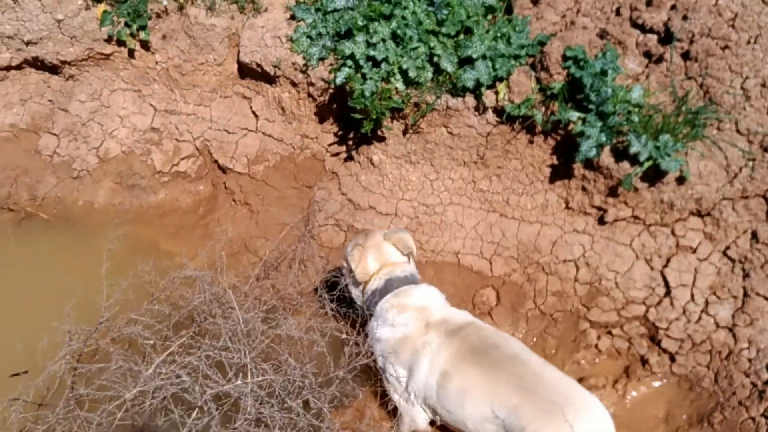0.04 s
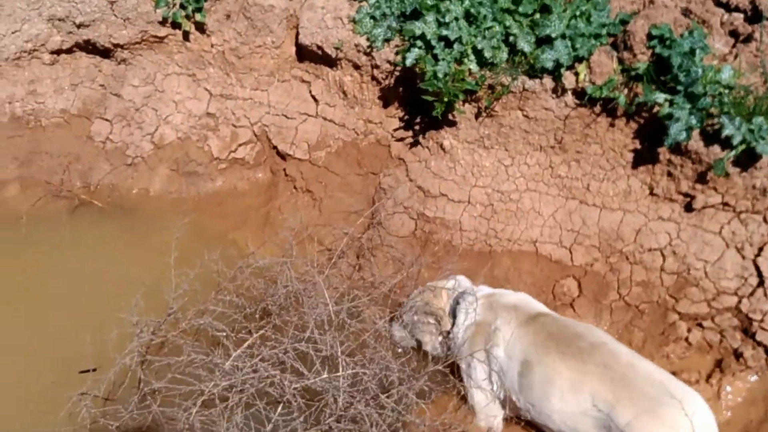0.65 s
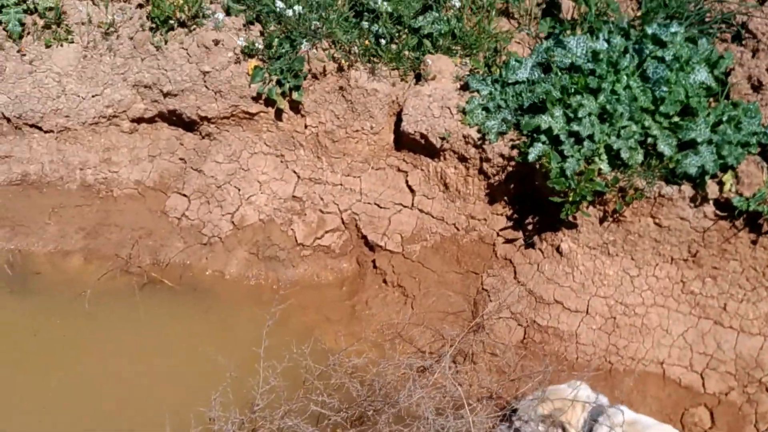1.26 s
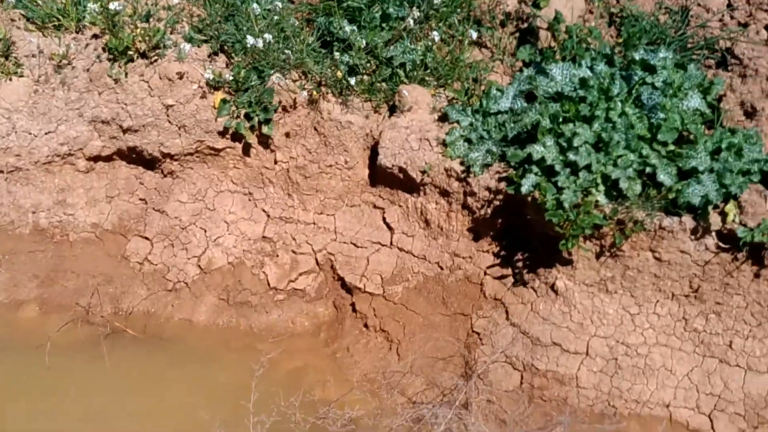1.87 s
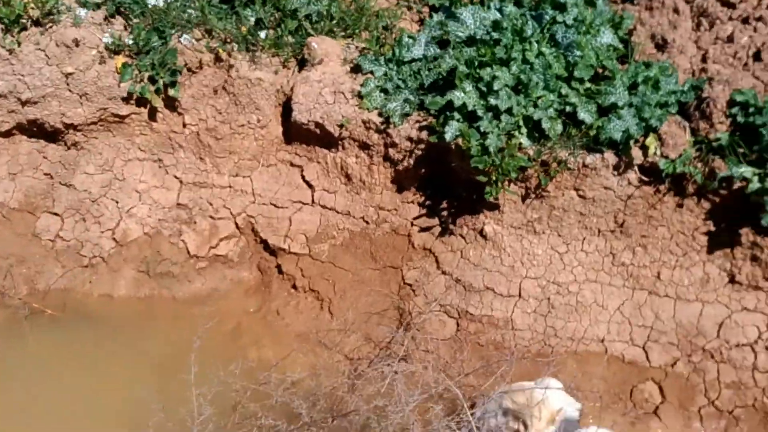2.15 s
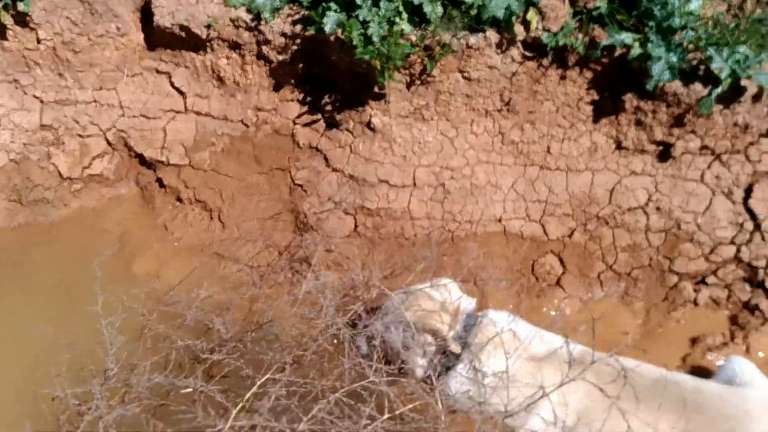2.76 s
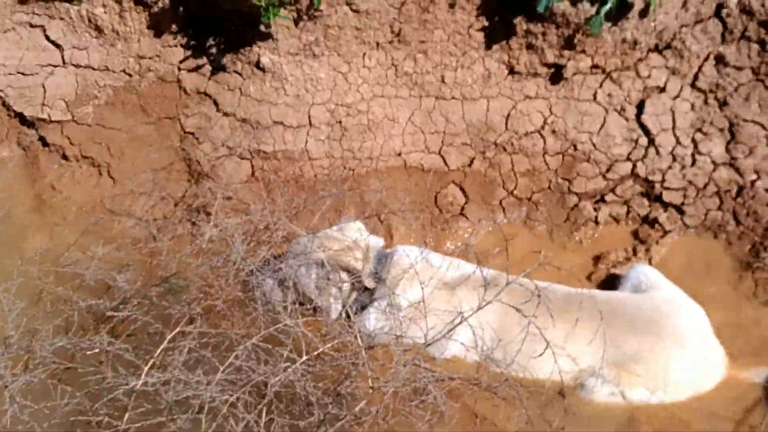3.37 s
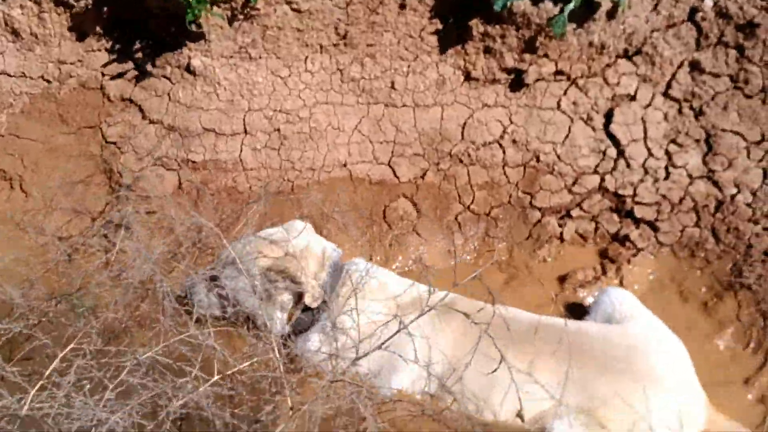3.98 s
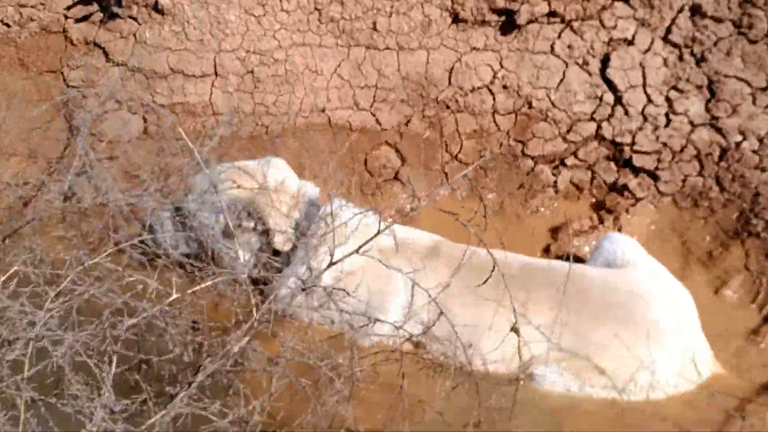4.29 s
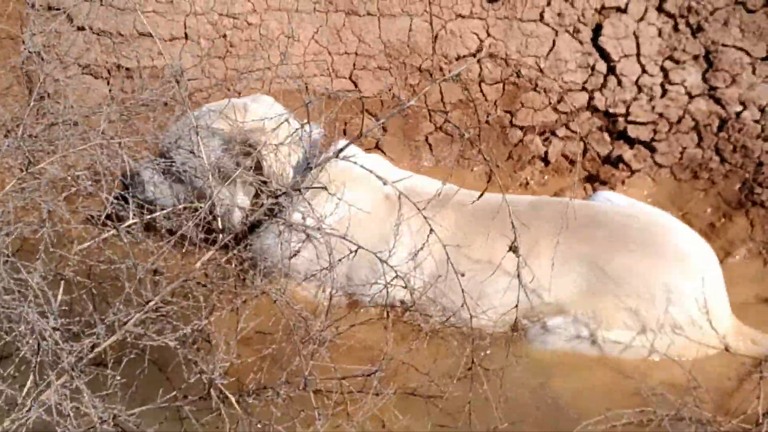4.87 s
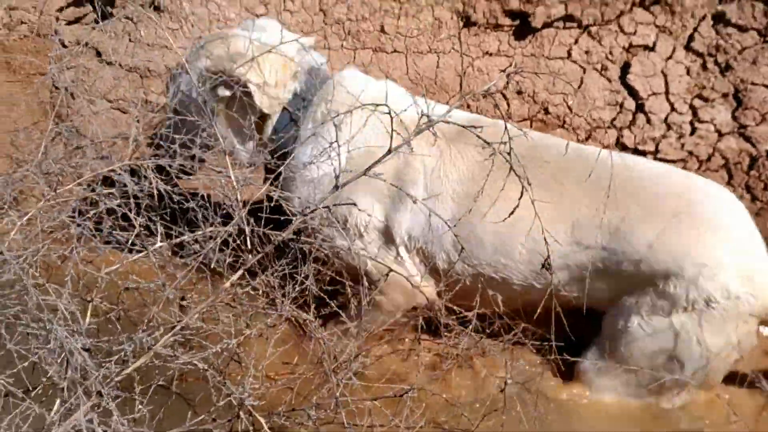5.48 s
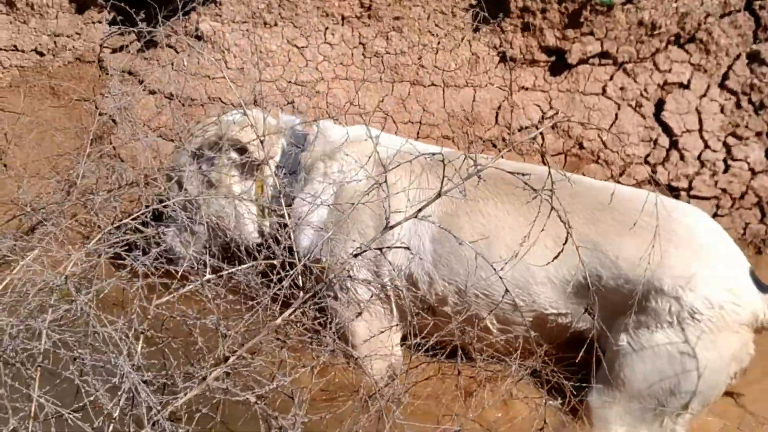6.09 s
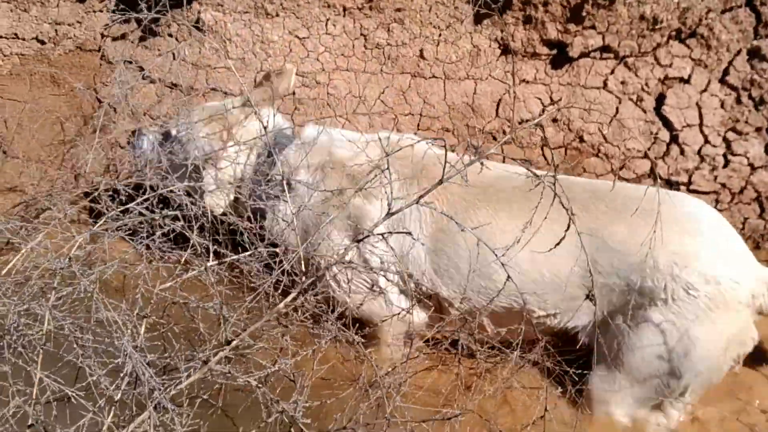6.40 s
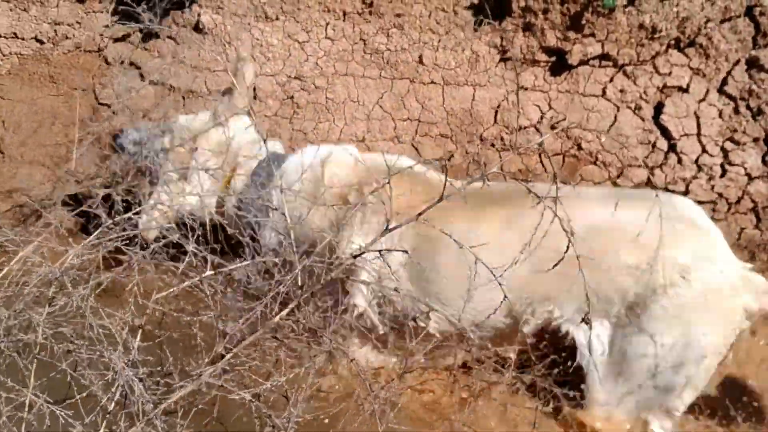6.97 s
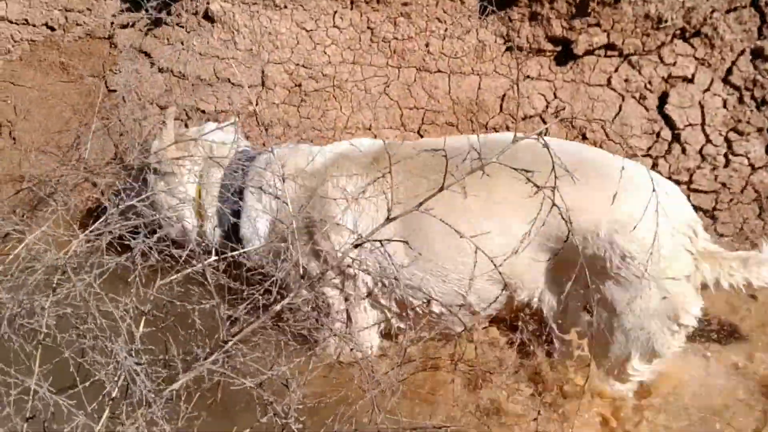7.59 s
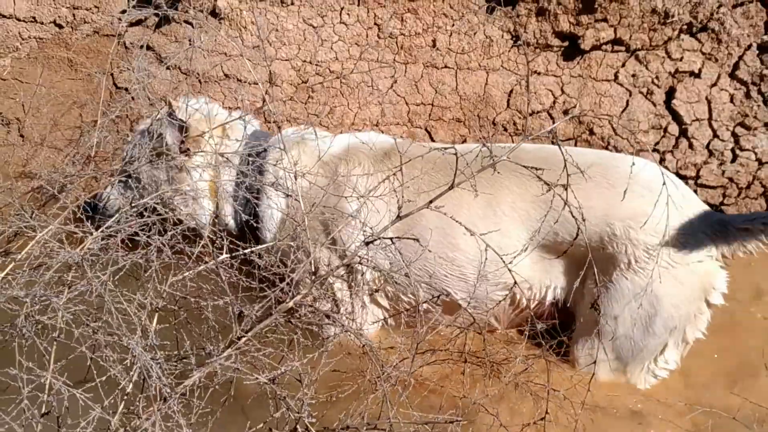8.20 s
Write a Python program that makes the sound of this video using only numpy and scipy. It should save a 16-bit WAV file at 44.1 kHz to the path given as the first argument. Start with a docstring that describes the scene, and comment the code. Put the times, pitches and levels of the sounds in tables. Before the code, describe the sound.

Outdoors, hard gusts rumble and thump on the microphone, shifting between right and left, over faint scuffs and ticks of dry twigs. Halfway through, the wind drops to light puffs. A dog heaves itself out of a shallow puddle, trickling and dripping, then shakes its head: quick wet slaps of ears and paws, sloshing water, spray and small collar clinks. The water settles near the end.

```python
"""A muddy puddle in open country, among dry twigs. A dog lies in it, heaves itself up dripping, then
shakes its head and churns the water. Bubbles ring, paws and ears slap, drops spray, the coat scuffs
through mud and brush, twigs tick, the collar clinks. Gusts buffet the two microphone ports, each on
its own, with rumbling turbulence and sharp eddies: hard for four seconds, then in light puffs."""
import sys
import numpy as np
from scipy.fft import rfft, irfft, next_fast_len
from scipy.io import wavfile
from scipy.ndimage import uniform_filter1d, map_coordinates

SR = 44100
rng = np.random.default_rng(int(sys.argv[2]) if len(sys.argv) > 2 else 0)


def unload_audio(sound):
    """Save the sound as a 16-bit wav file, at the path given as the first command line argument."""
    columns = np.transpose(np.atleast_2d(sound))
    # keep every value between -1 and 1, then stretch to whole-number steps
    steps = np.round(np.clip(columns, -1, 1) * 32767)
    wavfile.write(sys.argv[1], SR, steps.astype(np.int16))


N = 363384

# Spectra. Each row: frequency in Hz, relative density in dB.
AIR_SPECTRUM = [(60, -4.5), (300, 14.5), (800, -2), (1150, -0.5), (1350, -2), (1600, -4.5), (3000, -7),
                (6000, -8.5), (8500, -10), (10000, -12), (14300, -18)]
EDDY_SPECTRUM = [(15, -45), (25, -28.5), (40, -15.5), (62, 7.5), (90, 3), (300, -6), (1000, -11),
                 (4000, -13.5), (15000, -3.5)]
SCUFF_SPECTRUM = [(300, 1), (900, 14), (2000, 10.5), (3000, -2), (4000, -6), (6000, -8), (8500, -15.5),
                  (10000, -18.5), (14300, -29.5)]
TWIG_SPECTRUM = [(1500, -3.5), (2800, -9.5), (3600, -2), (5200, 1.5), (6500, 1), (8500, -4), (10000, -6),
                 (14300, -7)]
SLOSH_SPECTRUM = [(130, -3), (260, -6.5), (400, -7.5), (520, -4), (750, -6), (970, 2.5), (1150, -3),
                  (1900, -1.5), (2700, -15), (4500, -39), (15000, -55)]
SPRAY_SPECTRUM = [(1200, -2.5), (2500, 4), (4000, -3), (5300, -4), (8500, -4.5), (10000, -12.5),
                  (13000, -11), (14300, -12.5)]
# Colour of the ports. Each row: frequency in Hz, left minus right in dB.
PORT_BALANCE = [(300, -4), (1000, -1.5), (2000, -5), (2900, -9), (4200, -9), (6300, -3.5), (8500, -12),
                (10500, -1.5), (13000, -4.5), (14300, 8)]
# Likeness of the ports. Each row: frequency in Hz, left-right correlation.
PORT_COHERENCE = [(300, 0.81), (1000, 0.97), (2000, 0.37), (4000, 0.14), (7000, 0.11)]
# Running airflow over each port. Each row: time in seconds, level in dB.
LEFT_FLOW = [(0, -22), (.6, -19), (.82, -24), (.88, -23.5), (1.1, -18.5), (1.57, -24), (1.73, -17),
             (2.3, -20.5), (2.75, -14), (2.99, -13.5), (3.02, -23.5), (3.1, -18), (3.38, -15),
             (3.78, -17.5), (3.82, -28), (3.9, -17), (3.97, -14.5), (4.29, -15), (4.35, -29.5),
             (5.7, -39.5), (5.97, -51), (6.85, -37.5), (7.57, -55), (8.24, -32.5)]
RIGHT_FLOW = [(0, -24.5), (.57, -16), (.59, -13.5), (.8, -13), (.86, -20), (.92, -13), (1.35, -14),
              (1.6, -21.5), (1.76, -14.5), (2.1, -11), (2.2, -21), (2.63, -29), (3.67, -24.5), (4.1, -36),
              (4.29, -26.5), (5.22, -45.5), (5.87, -46), (6.41, -31.5), (7.33, -44.5), (7.77, -43.5),
              (8.24, -29.5)]
# Puffs. Each row: start in seconds, hold in seconds, level in dB, port (0 left, 1 right).
WIND_PUFFS = [(1.873, 0.034, -21, 0), (2.25, 0.14, -21, 1), (2.347, 0.011, -13.5, 0),
              (2.437, 0.062, -12, 0), (2.48, .12, -20, 1), (2.632, 0.067, -20.5, 0), (2.699, 0.035, -17, 1),
              (2.826, 0.12, -16, 0), (2.838, 0.14, -21.5, 1), (2.936, 0.058, -12.5, 0),
              (3.064, 0.014, -15.5, 0), (3.117, 0.054, -20.5, 1), (3.133, 0.032, -18, 0),
              (3.282, 0.037, -24.5, 1), (3.391, 0.023, -18.5, 1), (3.499, 0.065, -29.5, 1),
              (3.608, 0.052, -16.5, 0), (3.689, 0.18, -19.5, 1), (3.728, 0.04, -11, 0),
              (4.161, 0.078, -20.5, 1), (4.289, 0.028, -28.5, 1), (4.447, 0.14, -26.5, 0),
              (4.489, 0.059, -30, 1), (4.573, 0.036, -23.5, 0), (4.668, .13, -26, 0), (4.677, .12, -26, 1),
              (4.916, .14, -27, 1), (5.089, 0.02, -25, 0), (5.187, 0.025, -29, 0), (5.253, 0.044, -33.5, 1),
              (5.414, 0.14, -28, 0), (5.419, .13, -25.5, 1), (5.596, 0.14, -35.5, 1),
              (5.735, 0.059, -38, 0), (6.111, 0.029, -23, 1), (6.29, 0.19, -30.5, 0),
              (6.311, 0.016, -22, 1), (6.53, 0.016, -19.5, 1), (6.669, 0.07, -26.5, 0),
              (6.961, .22, -36, 0), (7.743, 0.23, -33.5, 0), (7.859, 0.07, -28, 1),
              (8.111, 0.048, -34.5, 0)]
# Small fast eddies at gust crests. Each row: start in seconds, length in seconds, level in dB, port.
CREST_FLURRIES = [(.44, 0.21, -42, 1), (0.649, 0.13, -25, 1), (0.974, 0.14, -25, 1), (1.312, 0.16, -40, 1),
                  (1.905, 0.058, -18, 1), (2.352, 0.01, -18.5, 0), (2.457, 0.07, -18, 0),
                  (2.823, 0.052, -16.5, 0), (2.945, 0.059, -15.5, 0), (3.685, 0.032, -28, 0),
                  (3.745, 0.026, -30, 0), (3.975, 0.07, -25, 0)]
# Hardest single eddies. Each row: time in seconds, level in dB, port.
HARD_EDDIES = [(.584, -7.5, 1), (.669, -9, 1), (.822, -12, 1), (.834, -8.5, 1), (.888, -9.5, 1),
               (.917, -5, 1), (1.013, -8.5, 1), (1.116, -2.5, 1), (1.658, -16, 1), (1.752, -2.5, 1),
               (1.776, -1, 1), (1.798, -0.5, 1), (1.875, -10, 1), (1.972, -7, 1), (2.366, -9.5, 0),
               (2.443, -10, 0), (2.465, -4, 0), (2.489, -7, 0), (2.511, -4, 0), (2.642, -4, 0),
               (2.688, -10, 0), (2.705, -11, 0), (2.836, -9.5, 0), (2.98, -7, 0), (2.994, -14.5, 0),
               (3.143, -10, 0), (3.231, -10, 0), (3.409, -17, 1), (3.463, -17.5, 0), (3.523, -12.5, 0),
               (3.645, -10, 0), (3.775, -9.5, 0), (4.181, -15.5, 1)]
# Coat scuffing through mud and brush; dry twigs brushing along it.
# Each row: start in seconds, level in dB, length in seconds, low-pass corner in Hz.
COAT_SCUFFS = [(.29, -54, 0.12, 4000), (.432, -53, .045, 7000), (.752, -42.5, 0.051, 6000),
               (1.058, -40, 0.066, 9000), (1.497, -51.5, 0.042, 9000), (2.172, -40, 0.05, 12100),
               (2.33, -47.5, 0.11, 12000), (2.527, -39, 0.049, 4380), (2.749, -47, 0.045, 9000),
               (3.235, -52, 0.14, 5000), (3.563, -49, 0.084, 5000)]
TWIG_RUSTLES = [(0, -64.5, 0.56, 4850), (1.59, -68.5, 0.35, 12100), (2.21, -64.5, .14, 5000),
                (2.335, -58, 0.037, 8900), (2.85, -66, 0.052, 6400), (2.955, -59, 0.05, 10000),
                (3.01, -64, 0.14, 11700), (3.19, -63, .048, 12300), (3.9, -64, 0.088, 12000),
                (4.32, -68, .055, 10000), (4.975, -65, .05, 9050), (6.125, -53, .03, 12000),
                (7.11, -39.5, 0.31, 4650), (7.714, -44.5, .03, 11900)]
# Ticks of twigs and drops. Each row: start in seconds, level in dB, centre in Hz.
SHARP_TICKS = [(0.777, -36, 3550), (1.086, -22, 3020), (1.503, -34.5, 3700), (1.85, -27.5, 3020),
               (2.756, -27.5, 3220), (3.399, -28, 6170), (3.574, -33.5, 5000), (4.319, -36.5, 4230),
               (4.398, -34.5, 3650), (4.565, -36, 4870), (5.083, -34.5, 7160), (5.566, -29, 3480),
               (5.736, -30.5, 3040), (5.753, -31, 3930), (5.851, -32, 4370), (5.872, -30, 4770),
               (5.911, -36, 4400), (5.957, -34.5, 6550), (6.046, -27, 4860), (6.307, -22.5, 6460),
               (6.486, -18, 3580), (6.577, -18, 3560), (6.596, -17.5, 7530), (6.807, -17.5, 6100),
               (6.926, -22.5, 4000), (7.089, -13.5, 4830)]
# Collar clinks as the head whips round. Each row: start in seconds, level in dB.
COLLAR_CLINKS = [(6.21, -24.5), (6.286, -14.5), (6.577, -17.5), (6.804, -29), (6.809, -25.5), (6.952, -27),
                 (7.092, -25)]
# Click of a clink. Each row: centre in Hz, relative level in dB.
CLICK_BANDS = [(3700, -21.5), (8200, -8.5), (13600, -13)]
# Metal ring of a clink. Each row: frequency in Hz, relative level in dB, T60 in seconds.
METAL_MODES = [(7370, -38.5, 0.082), (8120, -16.5, 0.026), (8930, -24, 0.049)]
# Single air bubbles. Each row: start in seconds, pitch in Hz, level in dB, T60 in seconds.
AIR_BUBBLES = [(.36, 820, -38.5, 0.24), (0.554, 1260, -32.5, 0.02), (4.341, 1340, -43, 0.03),
               (4.364, 1310, -42, 0.05), (4.792, 4180, -48.5, 0.016), (4.805, 4160, -50, 0.013),
               (4.973, 1580, -46, 0.045), (5.038, 2290, -41.5, .04), (5.046, 1190, -42, 0.035),
               (5.127, 1430, -30.5, 0.02), (5.132, 2120, -34, .02), (5.133, 1000, -29, 0.016),
               (5.148, 1280, -34, 0.038), (5.214, 2200, -34, 0.022), (5.252, 790, -39, 0.088),
               (5.275, 2250, -35.5, 0.031), (5.286, 1300, -26.5, 0.021), (5.366, 1700, -45, .03),
               (5.391, 1710, -36, 0.027), (5.417, 1960, -30.5, 0.032), (5.438, 2060, -35, 0.033),
               (5.473, 1750, -39, 0.044), (5.579, 530, -38, 0.062), (5.675, 2350, -37, 0.022),
               (5.702, 1300, -33.5, 0.055), (5.769, 1380, -38, 0.041), (6.259, 3180, -34.5, 0.029),
               (6.389, 980, -12.5, 0.015), (6.605, 433, -17, 0.054), (6.724, 2070, -28, 0.037),
               (6.754, 940, -26.5, 0.067), (6.909, 937, -23.5, 0.046), (6.981, 520, -18, 0.016),
               (7.018, 820, -21.5, 0.032), (7.157, 935, -22.5, 0.041), (7.231, 527, -16.5, 0.043),
               (7.34, 644, -32, 0.033), (7.408, 1290, -25.5, 0.027), (7.413, 682, -31, 0.044),
               (7.482, 1880, -28.5, 0.059), (7.664, 660, -43, 0.15)]
# Slaps of paws and ears. Each row: start in seconds, level in dB, centre in Hz, T60 in seconds.
WET_SLAPS = [(.228, -41, 930, 0.29), (0.439, -43.5, 1570, 0.046), (0.464, -42, 1460, 0.011),
             (4.32, -39.5, 1700, 0.012), (4.399, -53.5, 1490, 0.022), (4.68, -50, 2600, 0.029),
             (5.578, -42, 900, 0.02), (5.625, -37, 1410, .03), (5.682, -36.5, 1270, .035),
             (5.851, -45.5, 1390, 0.021), (5.982, -40.5, 1660, 0.038), (6.232, -19, 860, 0.0047),
             (6.287, -25.5, 1380, 0.015), (6.323, -24.5, 1580, 0.019), (6.389, -25.5, 1610, 0.039),
             (6.48, -24.5, 1600, 0.048), (6.488, -15.5, 1030, 0.012), (6.555, -25.5, 1240, 0.042),
             (6.639, -27, 770, 0.025), (6.577, -22.5, 1700, 0.01), (6.684, -23.5, 1370, 0.12),
             (6.874, -24, 1070, 0.027), (6.95, -20.5, 1360, 0.01), (6.977, -24.5, 2270, 0.065),
             (7.019, -23, 990, 0.013), (7.034, -23.5, 1490, 0.037), (7.077, -28.5, 1200, 0.034),
             (7.106, -20.5, 1250, 0.04), (7.162, -22.5, 2200, 0.067), (7.361, -22.5, 1290, 0.015),
             (7.505, -26, 1880, 0.072), (7.608, -36, 1280, .025), (7.717, -31, 2030, 0.032)]
# Water stirred by the dog lying, rising, shaking. Each row: time in seconds, level in dB.
BODY_STIR = [(0, -66), (2.9, -64.5), (4.28, -73.5), (4.36, -57.5), (4.6, -70.5), (4.93, -79), (5.03, -61),
             (5.13, -44), (5.45, -45.5), (5.62, -65.5), (6.19, -60.5), (6.34, -38.5), (6.88, -37),
             (7.04, -30.5), (7.24, -36), (7.45, -41.5), (7.6, -53), (7.76, -56.5), (7.98, -70), (8.24, -72)]
# Fine drops running off the coat. Each row: time in seconds, level in dB.
COAT_DRIPS = [(0, -87.5), (4.9, -85.5), (5.1, -64), (5.4, -51), (5.75, -54), (6.1, -66), (7.5, -42.5),
              (7.75, -57), (8.0, -66), (8.24, -71.5)]

STIFF_WIND_DB, CALM_CORNER_HZ, EDDY_WIDTH_S = -15.5, 194, 0.00028
FULL_CHURN_DB, SHOWER_FROM_S = -40.5, 5.6


def amp(db):
    """Decibels to gain."""
    return 10 ** (np.asarray(db) / 20)


def unit(x):
    """Scale to rms 1."""
    return x / np.sqrt(np.mean(x ** 2) + 1e-20)


def along(points, hz):
    """Interpolate (Hz, value) points on a log axis."""
    freqs, values = np.transpose(points)
    return np.interp(np.log(hz + 1), np.log(freqs), values)


def curve(points):
    """Interpolate (seconds, value) points at every sample."""
    return np.interp(np.arange(N) / SR, *np.transpose(points))


def wobble(rate_hz):
    """Smooth random curve."""
    knots = rng.standard_normal(20000)
    return map_coordinates(knots, [np.arange(N) * rate_hz / SR], order=2, mode="wrap")


def swell(start_s, attack_s, hold_s, t60_s):
    """Envelope: rise, hold, decay."""
    t = np.arange(N) / SR - start_s
    return np.clip(t / attack_s, 0, 1) * amp(-60 * np.clip((t - hold_s) / t60_s, 0, 2))


def filtered(x, response):
    """Apply a gain given as a function of Hz."""
    n = x.shape[-1]
    size = next_fast_len(n + 4096)
    return irfft(rfft(x, size) * response(np.fft.rfftfreq(size, 1 / SR)), size)[..., :n]


def coloured(x, spectrum):
    """Shape by a (Hz, dB) spectrum, at rms 1."""
    return unit(filtered(x, lambda hz: amp(along(spectrum, hz))))


def add(track, start_s, sound):
    """Mix a sound into a stereo track."""
    part = track[:, round(start_s * SR):][:, :sound.shape[-1]]
    part += sound[..., :part.shape[1]]


def stereo_noise(size):
    """White noise, alike at both ports in the bass, nearly unrelated in the treble."""
    def mid_side_gains(hz):
        angle = np.arccos(np.clip(along(PORT_COHERENCE, hz), -1, 1)) / 2
        return np.array([np.cos(angle), np.sin(angle)])
    mid, side = filtered(rng.standard_normal((2, size)), mid_side_gains)
    return np.array([mid + side, mid - side])


def port_colour_db(hz):
    """Left and right gain: half the imbalance each."""
    return np.array([[.5], [-.5]]) * along(PORT_BALANCE, hz)


def burst(peak_db, centre_hz, t60_s, octaves, attack_s):
    """Short splat of band noise."""
    t = np.arange(4096) / SR
    band = lambda hz: 1 / (1 + (np.log2((hz + 1) / centre_hz) / octaves) ** 4)
    envelope = amp(-60 * t / t60_s) * (1 - np.exp(-(t / attack_s) ** 2))
    splat = filtered(stereo_noise(4096), band) * envelope
    return amp(peak_db) * splat / np.abs(splat.mean(0)).max()


def ring(t, hz, t60_s, rise):
    """Damped sine; the pitch climbs by the fraction `rise` per T60."""
    phase = 2 * np.pi * hz * t * (1 + rise * t / t60_s / 2)
    return np.sin(phase) * amp(-60 * t / t60_s) * (1 - np.exp(-2 * hz * t))


def open_air(level_db=-63, colour_share=.3):
    """Steady air from all around; takes only a share of the ports' colour."""
    hush = coloured(stereo_noise(N), AIR_SPECTRUM)
    return filtered(hush, lambda hz: amp(level_db + colour_share * port_colour_db(hz)))


def airflow_db(flow, port, flutter_db):
    """Wind level on one port: fluttering flow plus puffs."""
    power = amp(curve(flow) + flutter_db * wobble(22.066)) ** 2
    for start_s, hold_s, db, side in WIND_PUFFS:
        if round(side) == port:
            power += (amp(db) * swell(start_s, attack_s=0.0078, hold_s=hold_s, t60_s=0.12)) ** 2
    return 10 * np.log10(power)


def buffet(level_db, shift_hz, exponent, ceiling, order, lump_db, jitter_octaves, trim_db):
    """Turbulence on one port: faster air sheds smaller eddies, in brief bursts."""
    force = amp(level_db - STIFF_WIND_DB)
    lumps = np.minimum(force, 1) ** 0.09 * np.clip(wobble(110), -2, 2)  # light air rolls more smoothly
    jitter = lumps + 1.19 * np.clip(wobble(240), -2, 2)
    corner_hz = CALM_CORNER_HZ * force ** 0.25 + shift_hz * np.minimum(force ** exponent, ceiling)
    corner_hz = (corner_hz * 2 ** (jitter_octaves * jitter))[::16]
    # Moving low-pass in half-octave bands, at constant power.
    centres_hz = 20 * 2 ** (np.arange(19) / 2)
    rolloff = np.sqrt(1 + (centres_hz[:, None] / corner_hz) ** (2 * order))
    gains = amp(along(EDDY_SPECTRUM, centres_hz))[:, None] / rolloff
    gains /= np.sqrt(centres_hz @ gains ** 2)
    size = next_fast_len(N)
    white = rfft(rng.standard_normal(N), size)
    hz = np.fft.rfftfreq(size, 1 / SR)
    roar = np.zeros(N)
    for share, gain in zip(np.eye(len(centres_hz)), gains):
        band = irfft(white * np.interp(hz, centres_hz, share, left=0, right=0), size)[:N]
        roar += band * np.interp(np.arange(N), np.arange(N)[::16], gain)
    running_rms = np.sqrt(np.abs(uniform_filter1d(roar ** 2, size=2600)) + 1e-20)
    return amp(level_db + trim_db) * unit(roar / running_rms * amp(lump_db * lumps))


def eddy(t, width_s, rounding=0.71, suction=0.42):
    """One eddy on a port: a sharp pressure cusp, then a rounder suction."""
    u = t / width_s
    return np.exp(rounding - np.hypot(u, rounding)) - suction * np.exp(-((u - 3.5) / 2.4) ** 2)


def flurries(eddies_per_s=260):
    """A crackling train of small eddies runs over one port as a gust crests."""
    level, t = np.zeros((2, N)), np.arange(N) / SR
    for start_s, length_s, db, port in CREST_FLURRIES:
        progress = np.clip((t - start_s) / length_s, 0, 1)
        level[round(port)] += amp(db) * (4 * progress * (1 - progress)) ** .25
    count = eddies_per_s * N // SR
    when, width, strength, sign = rng.random((count, 4)).T[:, :, None]
    starts = ((np.arange(count)[:, None] + 2 * when) * SR / eddies_per_s).astype(int)
    cusps = eddy((np.arange(512) - 160) / SR, EDDY_WIDTH_S * 2 ** (1.5 * width - .6))
    cusps *= np.sign(sign - .5) * amp(6.7 * strength)
    train = np.bincount((starts + np.arange(512)).ravel(), cusps.ravel(), N)[:N]
    clumps = amp(4 * np.clip(wobble(55), -2, 1))
    return level * unit(train * clumps)


def eddy_hits(lead_s=.004):
    """The hardest eddies hit one port square, each with a short rough wake."""
    track = np.zeros((2, N))
    cusp = eddy(np.arange(SR // 50) / SR - lead_s, EDDY_WIDTH_S)
    for time_s, db, port in HARD_EDDIES:
        side = np.eye(2)[round(port)]
        wake = burst(db - 5, centre_hz=465, t60_s=0.037, octaves=0.71, attack_s=0.00068).mean(0)
        add(track, time_s - lead_s, np.outer(side, amp(db) * cusp))
        add(track, time_s, np.outer(side, wake))
    return track


def wind():
    """Separate turbulence on each port; the flow tears at its fastest peaks."""
    left = buffet(airflow_db(LEFT_FLOW, port=0, flutter_db=0.95), shift_hz=142, exponent=0.93,
                  ceiling=1.27, order=3.38, lump_db=2.5, jitter_octaves=0.21, trim_db=-0.1)
    right = buffet(airflow_db(RIGHT_FLOW, port=1, flutter_db=0.5), shift_hz=220, exponent=1.2,
                   ceiling=1.57, order=3.1, lump_db=1.87, jitter_octaves=0.22, trim_db=-0.5)
    pressure = np.array([left, right]) + flurries() + eddy_hits()
    fast_pressure = filtered(pressure, lambda hz: 1 / (1 + (200 / (hz + 1)) ** 4))
    peaks = np.tanh(fast_pressure ** 2 / 0.51)
    tear_spectrum = [(300, -12.5), (1000, 19.5), (1900, -20.5), (3100, -20), (5000, -32), (12000, -54)]
    tearing = coloured(rng.standard_normal((2, N)), tear_spectrum)
    return pressure + amp(-18.5) * peaks * tearing


def swishes(strokes, spectrum, grit_db, attack_s=0.0056):
    """The coat rubs on mud or twigs: gritty strokes that rise fast and trail off."""
    track = np.zeros((2, N))
    grit = unit(coloured(stereo_noise(N), spectrum) * amp(grit_db * wobble(220)))
    for start_s, db, length_s, top_hz in strokes:
        noise = grit[:, round(start_s * SR):][:, :round(length_s * SR)]
        t = np.arange(noise.shape[1]) / SR
        envelope = np.clip(t / attack_s, 0, 1) * np.clip(2 * (1 - t / length_s), 0, 1)
        dulled = filtered(noise, lambda hz: 1 / np.sqrt(1 + (hz / top_hz) ** 10))
        add(track, start_s, amp(db) * envelope * unit(dulled))
    return track


def ticks():
    """Twigs and drops: a snap, then a short woody ring."""
    track = np.zeros((2, N))
    for start_s, db, hz in SHARP_TICKS:
        add(track, start_s, burst(db - 10.5, hz, t60_s=0.012, octaves=0.62, attack_s=0.00056))
        add(track, start_s, burst(db - 16, hz, t60_s=0.035, octaves=0.2, attack_s=0.00062))
    return track


def collar():
    """The collar's metal parts click and ring faintly."""
    track, t = np.zeros((2, N)), np.arange(SR // 5) / SR
    for start_s, db in COLLAR_CLINKS:
        for hz, band_db in CLICK_BANDS:
            add(track, start_s, burst(db + band_db, hz, t60_s=.012, octaves=0.27, attack_s=0.0008))
        for hz, mode_db, t60_s in METAL_MODES:
            add(track, start_s, amp(db + mode_db + rng.normal(0, 2.2)) * ring(t, hz, t60_s, rise=0))
    return track


def plops():
    """A bubble pinches off with a splat and rings, its pitch climbing as it nears the surface."""
    track, t = np.zeros((2, N)), np.arange(SR // 5) / SR
    for start_s, hz, db, t60_s in AIR_BUBBLES:
        add(track, start_s, amp(db) * ring(t, hz, t60_s, rise=0.2))
        add(track, start_s, burst(db - 10.5, hz, t60_s=0.043, octaves=0.47, attack_s=0.0017))
    return track


def slaps():
    """Wet paws and flapping ears: a squelch with crisp spatter at its start."""
    track = np.zeros((2, N))
    for start_s, db, hz, t60_s in WET_SLAPS:
        squelch = burst(db, hz, t60_s, octaves=0.69, attack_s=0.00027)
        spatter = burst(db - 14.5, centre_hz=5500, t60_s=0.023, octaves=0.98, attack_s=0.00034)
        add(track, start_s, squelch + spatter)
    return track


def bubble_cloud(count, samples, low_hz, high_hz, cycles, spread_db, rise):
    """Ringing bubbles of random time, pitch, life and place, at rms 1."""
    when, pitch, life, strength, place, pan = rng.random((count, 6)).T[:, :, None]
    hz = low_hz * (high_hz / low_hz) ** pitch
    t60_s = cycles * 2 ** (2 * life - 1) / hz
    gain = amp(-spread_db * np.log(1 - .98 * strength)) * hz / low_hz  # a few stand out
    index = (when * N).astype(int) + np.arange(samples)
    ports = []
    for side in (-1, 1):
        delay_s = .0002 - side * 0.00022 * (.35 - place)
        t = np.maximum(np.arange(samples) / SR - delay_s, 0)
        waves = gain * amp(side * 2 * (pan - 1.5)) * ring(t, hz, t60_s, rise)
        ports.append(np.bincount(index.ravel(), waves.ravel(), N + samples)[:N])
    return unit(np.array(ports))


def spray(stir_db, churn, surge):
    """Separate drips, or a fine shower in churn and once water streams off the coat."""
    showering = np.clip((np.arange(N) / SR - SHOWER_FROM_S) * 10, 0, 1)
    shower = np.maximum(churn, 0.88 * showering)
    fine = bubble_cloud(16000, samples=200, low_hz=2500, high_hz=14000, cycles=16, spread_db=1.6, rise=.1)
    drips = bubble_cloud(1700, samples=400, low_hz=2600, high_hz=12000, cycles=16, spread_db=2.9,
                         rise=.11)
    drops = shower * coloured(fine + amp(-2) * stereo_noise(N), SPRAY_SPECTRUM)
    drops += (1 - shower) * coloured(drips + .5 * stereo_noise(N), SPRAY_SPECTRUM)
    thrown_db = FULL_CHURN_DB - 7 + 0.96 * (stir_db - FULL_CHURN_DB)
    level = amp(thrown_db) + amp(curve(COAT_DRIPS))
    return level * unit(drops * amp((2.3 - .6 * shower) * surge))


def slosh(stir_db, churn, surge):
    """Bubbles and foam hiss: small bubbles in a trickle, big ones in churn."""
    big = bubble_cloud(7000, samples=700, low_hz=260, high_hz=3400, cycles=14, spread_db=1.8, rise=.15)
    small = bubble_cloud(2600, samples=900, low_hz=600, high_hz=3300, cycles=26, spread_db=2.3, rise=.15)
    churning = coloured(big + amp(-2) * stereo_noise(N), SLOSH_SPECTRUM)
    trickle_spectrum = [(350, -25.5), (650, -7), (1350, -1.5), (2200, -6), (3200, -13), (7000, -11.5),
                        (15000, -58.5)]
    trickle = coloured(small + amp(-1) * stereo_noise(N), trickle_spectrum)
    blend = churn * churning + amp(3) * (1 - churn) * trickle
    return amp(stir_db) * unit(amp(1.6 * surge)) * blend


def stirred_water():
    """The dog's body and the wash after each slap drive slosh and spray, which surge together."""
    power = amp(curve(BODY_STIR)) ** 2
    for start_s, db, _, _ in WET_SLAPS:
        power += (amp(db - 9.5) * swell(start_s, attack_s=0.0051, hold_s=0, t60_s=0.06)) ** 2
    stir_db = 10 * np.log10(power)
    churn = np.clip((stir_db + 48.5) / 9, 0, 1)  # 0 trickle, 1 churn
    surge = np.clip(wobble(70), -1.6, 1.6)
    return slosh(stir_db, churn, surge) + spray(stir_db, churn, surge)


def scene():
    """Dog and open air take each port's colour; the wind blows right on the ports."""
    scuffs = swishes(COAT_SCUFFS, SCUFF_SPECTRUM, grit_db=4.0)
    rustles = swishes(TWIG_RUSTLES, TWIG_SPECTRUM, grit_db=1.5)
    dog = scuffs + rustles + stirred_water() + plops() + slaps() + ticks() + collar()
    return filtered(dog, lambda hz: amp(port_colour_db(hz))) + open_air() + wind()


def record(dry, low_cut_hz=19, ceiling=.92, top_hz=14700):
    """Rumble cut, soft peak limit, band limit."""
    trimmed = filtered(dry, lambda hz: 1 / np.sqrt(1 + (low_cut_hz / (hz + 1)) ** 6))
    rounded = trimmed / (1 + np.abs(trimmed / ceiling) ** 6) ** (1 / 6)
    return filtered(rounded, lambda hz: np.clip((top_hz - hz) / 900 + .5, 0, 1))


dry = scene()
out = record(dry)
unload_audio(out)
```